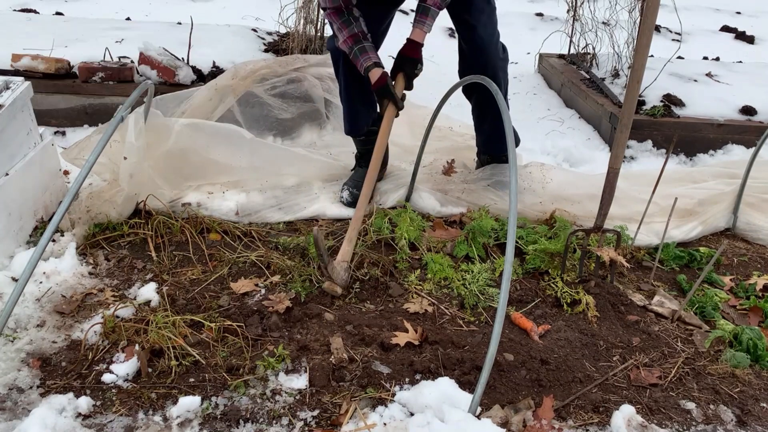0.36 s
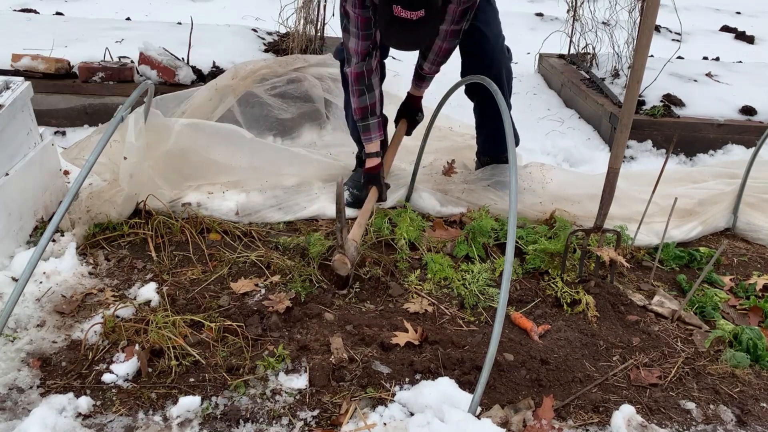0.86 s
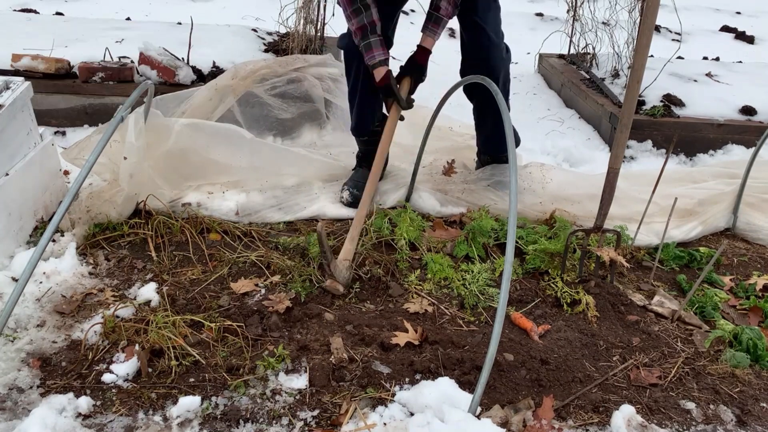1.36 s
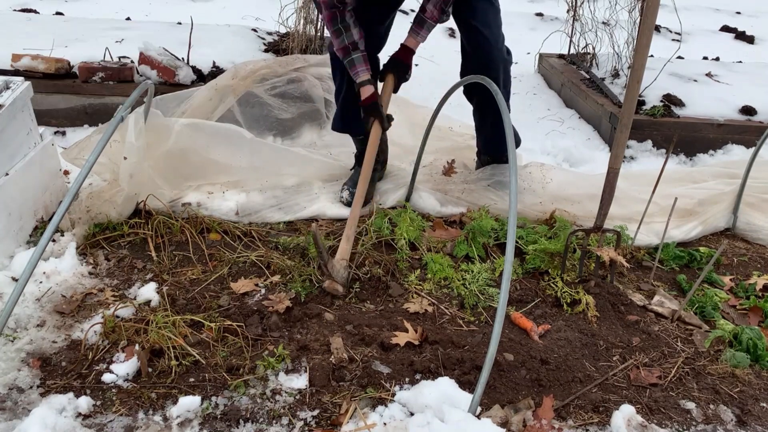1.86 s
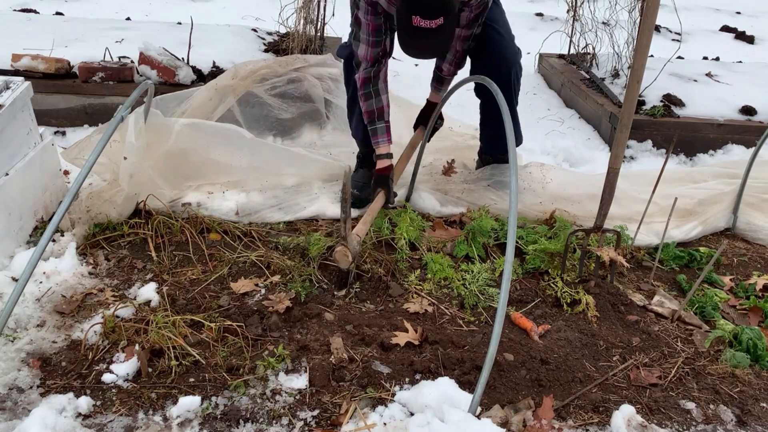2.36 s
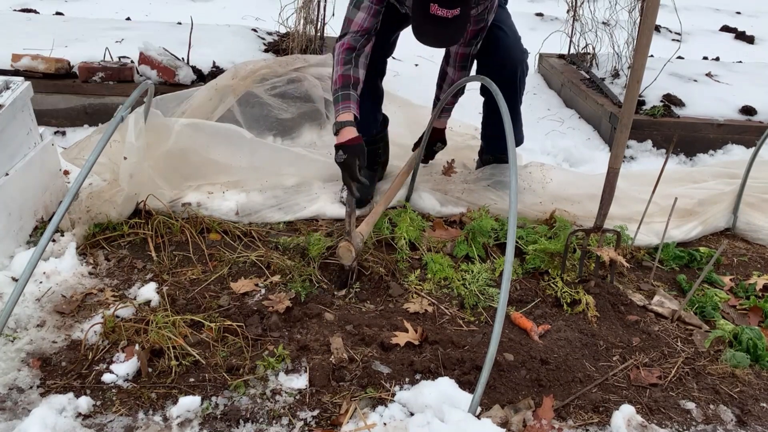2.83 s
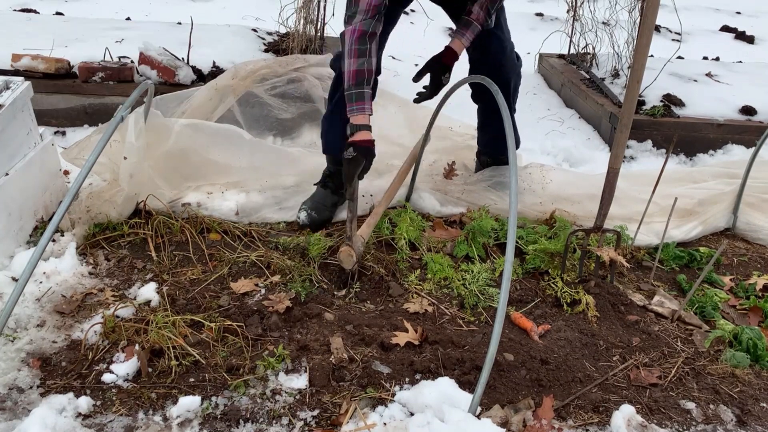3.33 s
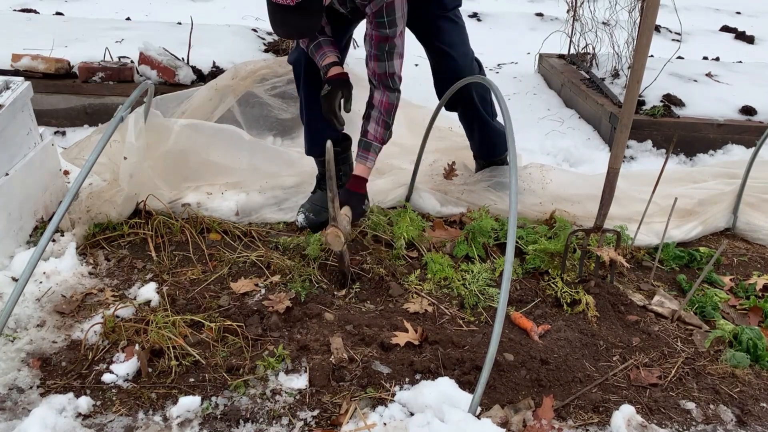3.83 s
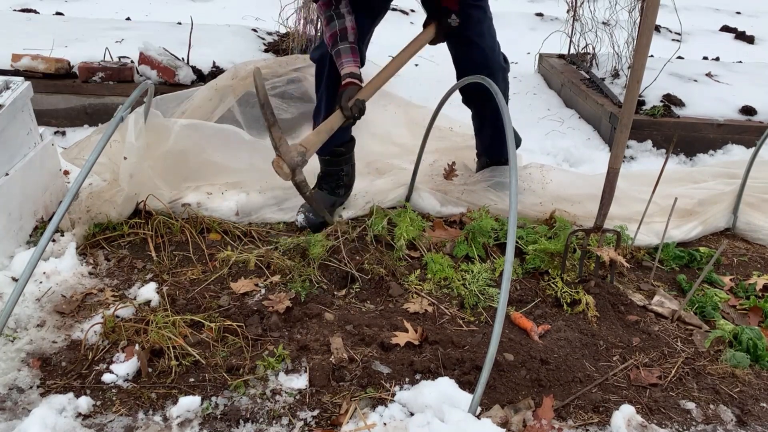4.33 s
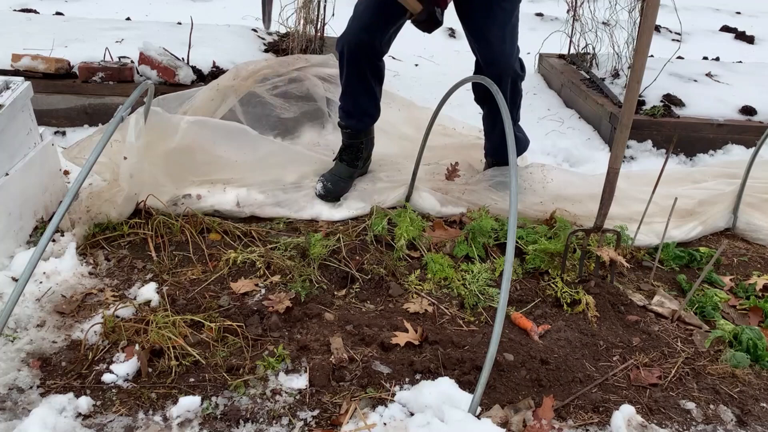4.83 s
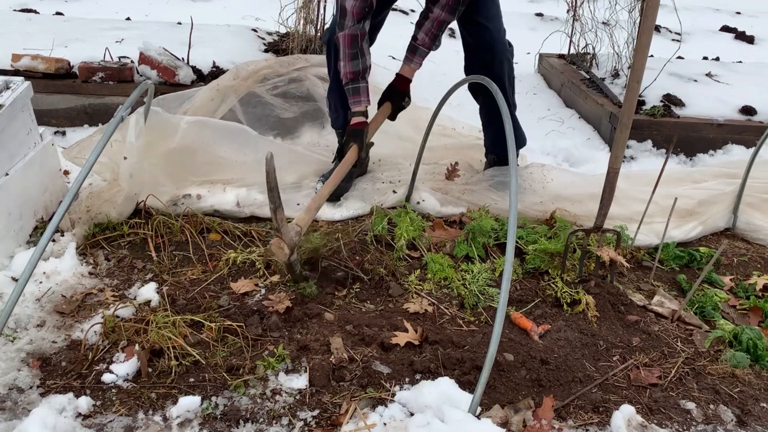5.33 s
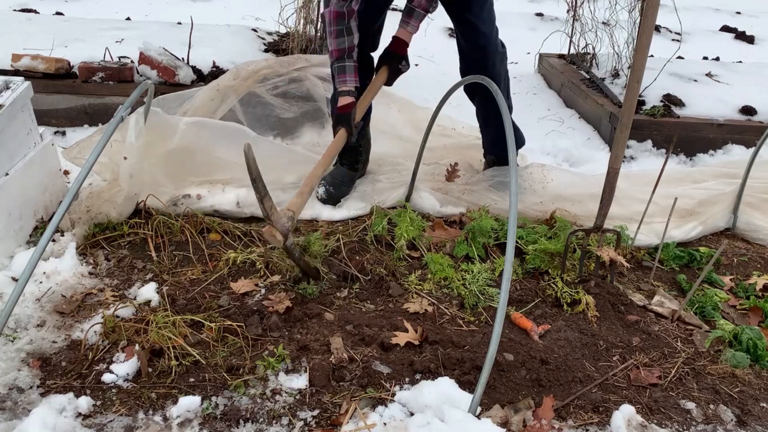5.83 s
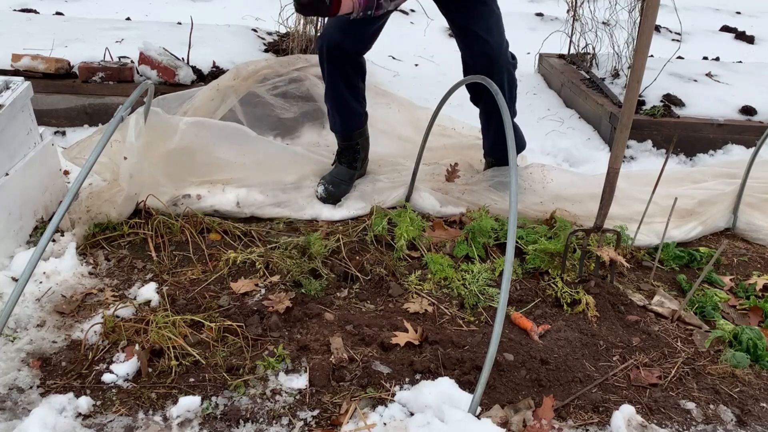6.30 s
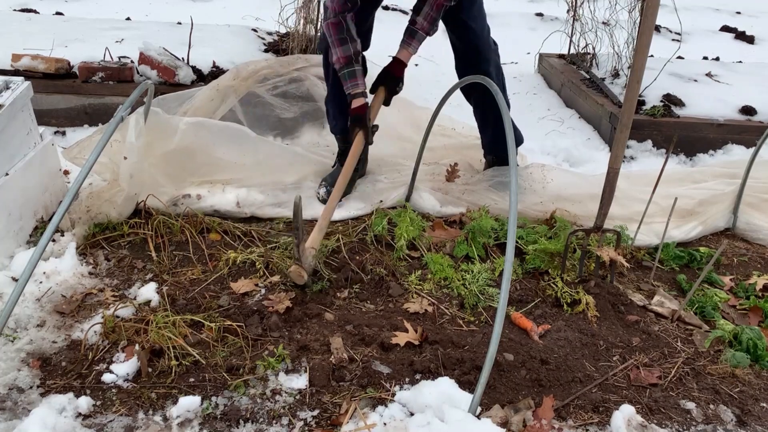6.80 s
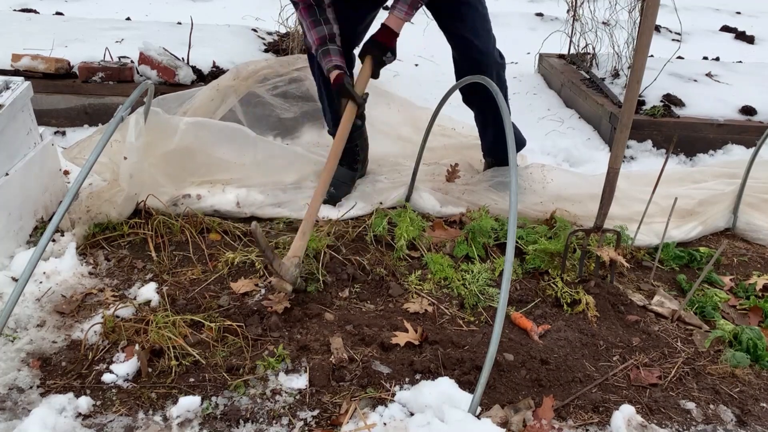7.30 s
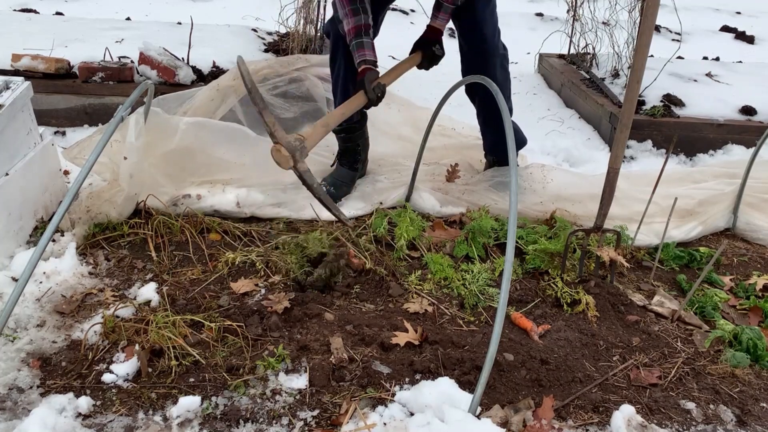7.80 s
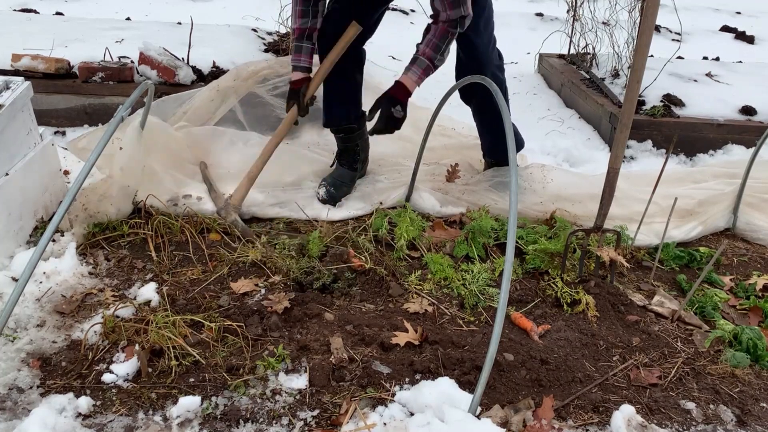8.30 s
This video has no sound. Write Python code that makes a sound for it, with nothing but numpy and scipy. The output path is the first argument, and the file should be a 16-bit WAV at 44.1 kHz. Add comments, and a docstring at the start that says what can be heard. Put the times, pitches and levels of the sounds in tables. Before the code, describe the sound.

Outdoors, close stereo microphone, faint air hiss and a distant car on the left. In the first half second, roots crackle and dry crumbs click as a pick is levered, with soft glove and sleeve rustle. Near 2.3 s a sharp, dry wooden knock; at 2.9 s a quick rattling chatter of the loose head. Around 3.2-3.4 s, rubbing bumps, a low thud and a faint squeak; another squeak at 3.9 s. The car's tyre moan and roar swell steadily. At 4.65 s a rough hand slide along the handle with a light knock. At 5.25 s a heavy blow: snap, crunch, deep thud, short steel ring. At 6.5 s another, brighter and icier, with scattering bits. The car passes at about 6.8 s from left to right, rumbling and hissing. Small clicks at 6.75 and 7.1 s, soft rustles, then a last glove scrape and handle knock at 8.3 s.

```python
"""A pickaxe is levered and swung into frozen soil in a snowy garden, close to a two-port microphone.
Each blow is a crunch of shaped noise with fading tones for the handle and the steel head; low tones are
the thuds of the frozen crust. Shaped noise makes gloves, sleeves, soft rustles and dry clicks; roots
crackle, the head chatters and the grip squeaks in short tones. Behind, over a faint air hiss, a car built
from six bands of noise comes up the road from the left and passes to the right."""
import sys
import numpy as np
from scipy import signal
from scipy.fft import rfft, irfft, next_fast_len
from scipy.io import wavfile
from scipy.ndimage import uniform_filter1d, map_coordinates

SR = 44100
rng = np.random.default_rng(int(sys.argv[2]) if len(sys.argv) > 2 else 0)


def ratio_of_db(decibels):
    """Turn decibels (scalar or array-like) into linear amplitude factors; 0 dB maps to 1."""
    return 10 ** (np.asarray(decibels, float) / 20)


def transcribe(signal):
    """Save signal, clipped to [-1, 1], as a 16-bit WAV file at the path in sys.argv[1]."""
    frames = np.atleast_2d(signal).T
    limited = np.clip(frames, -1, 1)
    pcm = np.round(limited * 32767).astype(np.int16)
    wavfile.write(sys.argv[1], SR, pcm)


N = 371189  # length in samples


def unit(x):
    """Scales a sound to an rms of 1."""
    return x / np.sqrt(np.mean(x ** 2) + 1e-20)


def curves(rows):
    """Joins table rows by straight lines: one value per sample for each column after the time."""
    times, *columns = np.transpose(rows)
    return [np.interp(np.arange(N) / SR, times, column) for column in columns]


def wobble(rate):
    """A smooth random curve through `rate` random points a second."""
    points = rng.standard_normal(int(N * rate / SR) + 4)
    return map_coordinates(points, [np.arange(N) * rate / SR])


def filtered(x, response):
    """Multiplies each frequency of a sound by response(hz)."""
    size = next_fast_len(x.shape[-1] + 8192)
    hz = np.fft.rfftfreq(size, 1 / SR)
    return irfft(rfft(x, size) * response(hz), size)[..., :x.shape[-1]]


def coloured(x, spectrum):
    """Filters a sound through (frequency [Hz], level [dB]) points, then scales it to an rms of 1."""
    points_hz, points_db = np.transpose(spectrum)

    def response(hz):
        return ratio_of_db(np.interp(np.log(hz + 1), np.log(points_hz), points_db))
    return unit(filtered(x, response))


def rush(spectrum, patchy_db):
    """Coloured noise, louder and softer in random patches of time and frequency."""
    noise = signal.stft(rng.standard_normal(N), nperseg=512)[2]
    patches = uniform_filter1d(rng.standard_normal(noise.shape), 5, 0)
    patches = unit(uniform_filter1d(patches, 12, 1))
    patchy = signal.istft(noise * ratio_of_db(patchy_db * patches), nperseg=512)[1][:N]
    return coloured(patchy, spectrum)


def ports(x, lag_ms, pan_db):
    """One sound at both ports: the left one is lag_ms later and pan_db louder than the right."""
    n = np.arange(len(x))
    half_lag = lag_ms * SR / 2000  # samples
    left = map_coordinates(x, [n - half_lag])
    right = map_coordinates(x, [n + half_lag])
    return np.array([left * ratio_of_db(pan_db / 2), right * ratio_of_db(-pan_db / 2)])


def air():
    """A faint, patchy hiss of the air, drawn separately from all the other sounds."""
    # tone of the hiss: (frequency [Hz], relative level [dB per Hz])
    air_tone = [(1500, -37), (3000, 2), (5000, -4), (8000, 0), (14000, -3), (16000, -8)]
    return ratio_of_db(-78) * rush(air_tone, patchy_db=2.5)


def car():
    """Noise voices reach the ports straight from the road, and scattered by fences and beds."""
    # (time [s], engine rumble [dB], low, middle and high tyre tones [dB each])
    car_levels = [(0.0, -57, -50, -50, -57), (0.7, -58, -48.5, -50.5, -59),
                  (1.2, -61.5, -48.5, -48.5, -56.5), (1.9, -53.5, -49.5, -43.5, -59.5),
                  (2.5, -56.5, -45.5, -41.5, -55.5), (3.1, -59, -42, -39.5, -49.5),
                  (3.6, -54, -40.5, -38.5, -48.5), (4.2, -52, -34.5, -38, -44), (4.5, -55, -33.5, -30, -41),
                  (4.8, -52.5, -32.5, -26, -38.5), (5.1, -43.5, -37, -28.5, -40),
                  (5.7, -43.5, -39, -31.5, -34.5), (6.2, -37, -44, -32, -38.5),
                  (6.62, -33.5, -47, -40.5, -40), (6.85, -35, -47.5, -41.5, -35),
                  (7.05, -33, -45.5, -38, -33.5), (7.22, -33, -45.5, -36, -33), (7.4, -38.5, -50, -39, -36),
                  (7.65, -36.5, -50, -40.5, -35), (8.1, -37, -53, -46.5, -39.5),
                  (8.4, -39.5, -47, -45, -39.5)]
    # roar and whirr once more off a wall along the road: (time [s], delay [ms], strength [0-1])
    wall_echo = [(0.0, 1.45, .15), (1.3, 1.43, .25), (2.0, 1.42, .2), (3.0, 1.33, .4), (3.9, 1.18, .55),
                 (4.5, 1.0, .6), (5.0, .8, 0)]
    # the hiss swells, briefly where the tyres cross grit: (time [s], rise over hiss [dB], half length [s])
    road_grit = [(6.998, 1, 0.15), (7.7, 3.5, 0.41), (7.85, 6.5, 0.014), (7.916, 10.5, .012)]
    # tones of the six voices: (frequency [Hz], relative level [dB per Hz])
    rumble_tone = [(20, -58.5), (40, -3.5), (85, 4), (130, -7), (200, -10.5), (350, -26), (900, -66)]
    drone_tone = [(120, -42.5), (200, -13.5), (278, -9), (298, -2.5), (320, -10.5), (400, -7), (480, -12),
                  (900, -59.5)]
    moan_tone = [(350, -24.5), (400, -20), (478, -17), (515, 6), (555, 3.5), (605, 5), (650, 3), (690, -3),
                 (1000, -56)]
    roar_tone = [(400, -22), (600, -21), (700, 1.5), (790, 6.5), (850, 6), (940, 3.5), (1020, -6),
                 (1100, -13.5), (1400, -22.5), (2200, -70)]
    whirr_tone = [(600, -36), (1000, 4.5), (1400, 2.5), (1600, 1.5), (2000, -5.5), (2800, -14), (4500, -58)]
    hiss_tone = [(1500, -31), (2500, 5), (4500, -0.5), (6500, -9.5), (8500, -20), (12000, -89),
                 (16500, -81)]
    # long waves bend round the microphone body: (lag factor [no unit] of rumble, drone, moan, roar)
    bend = 2.0, 1.6, 1.44, 1.2

    t = np.arange(N) / SR
    rumble_db, moan_db, roar_db, whirr_db = curves(car_levels)
    near_db = rumble_db + 60  # nearness: the rumble over that of the far car
    drone_db = -20.5 + 0.79 * moan_db + 0.19 * near_db
    hiss_db = 6 + 1.475 * whirr_db + 0.17 * near_db + 0.6 * wobble(40)
    for s, swell_db, half_s in road_grit:
        hiss_db = hiss_db + swell_db * np.exp(-((t - s) / half_s) ** 2)

    pass_s, abreast_s = 6.8, 0.75  # when the car is abreast; its distance then over its speed
    bearing = np.arctan((t - pass_s) / abreast_s)  # radians
    turned = bearing - 0.3  # the ports are turned from the road
    lag_ms = 0.465 * np.sin(turned)
    # a small constant lean to the left; the car's side gains more when it is near
    pan_db = 1.5 - 4.5 * np.tanh(turned / 0.12) * np.cos(bearing) ** 0.62
    echo_ms, echo_strength = curves(wall_echo)
    surge_db = 0.23 * wobble(5.0)

    def voice(spectrum, db, lag, pan, scatter_db, patchy_db, echo=0):
        straight = rush(spectrum, patchy_db)
        straight = straight + echo * map_coordinates(straight, [np.arange(N) - echo_ms * SR / 1000])
        scattered = np.array([rush(spectrum, patchy_db), rush(spectrum, patchy_db)])
        scatter = ratio_of_db(scatter_db - 0.2 * near_db)  # a near car sounds clearer
        return ratio_of_db(db + surge_db) * (ports(straight, lag, pan) + scatter * scattered)

    rumble_lag, drone_lag, moan_lag, roar_lag = np.outer(bend, lag_ms)
    rumble = voice(rumble_tone, rumble_db, rumble_lag, 0.065 * pan_db, scatter_db=-9.5, patchy_db=2.0)
    drone = voice(drone_tone, drone_db, drone_lag, 0.066 * pan_db, scatter_db=-3.5, patchy_db=0.5)
    moan = voice(moan_tone, moan_db, moan_lag, 1.1 * pan_db, scatter_db=-9.0, patchy_db=1.6)
    roar = voice(roar_tone, roar_db, roar_lag, 0.59 * pan_db, scatter_db=-11, patchy_db=2.3,
                 echo=echo_strength)
    whirr = voice(whirr_tone, whirr_db, lag_ms, 0.68 * pan_db, scatter_db=-4.0, patchy_db=3.0,
                  echo=echo_strength)
    hiss = voice(hiss_tone, hiss_db, lag_ms, -0.2 * pan_db, scatter_db=-2.5, patchy_db=1.3)
    return rumble + drone + moan + roar + whirr + hiss


def swell_level_db():
    """The level of the strongest rubbing or rustling swell at each moment."""
    # gloves and sleeves, and long soft rustles or hiss while the car passes; a row a swell:
    # (time at full force [s], relative level [dB], rise [s], hold [s], fall [s])
    swells = [(0.085, -60, 0.98, 0.1, 0.092), (0.647, -58.5, 0.064, 0, 0.47), (0.84, -65, 0.076, 0, 0.19),
              (1.205, -64.5, 0.027, 0.11, 0.11), (1.445, -73, .04, 0, .05),
              (1.89, -61.5, 0.15, 0.066, 0.13), (2.068, -64, 0.44, 0.029, 0.095),
              (2.448, -64, 0.092, 0, 0.074), (2.643, -58.5, 0.043, 0.024, 0.026),
              (2.761, -62, 0.11, 0.008, 0.019), (2.855, -58, 0.075, 0, 0.23),
              (3.179, -44, 0.007, 0.077, 0.02), (3.325, -42, 0.035, 0.034, 0.014),
              (3.376, -54.5, .03, 0.026, 0.027), (3.443, -67.5, .1, 0, 0.22),
              (3.906, -57.5, 0.75, 0, 0.083), (4.078, -65.5, 0.055, 0.021, 0.0093),
              (4.157, -55, 0.013, 0, 0.07), (4.302, -58, 0.029, 0, 0.12), (4.5, -55.5, 0.051, 0.22, .05),
              (4.624, -37.5, .05, .03, .05), (4.659, -33, 0.07, 0.016, 0.09),
              (4.82, -61.5, 0.19, 0.059, 0.012), (4.965, -57.5, 0.04, 0, .055),
              (5.35, -59, 0.29, 0.86, 0.17), (5.568, -47, 0.19, 0, 0.12), (5.88, -54, .05, 0, .2),
              (6.413, -55.5, 0.041, 0.052, 0.054), (6.345, -63, .1, 1, .1),
              (6.627, -58.5, 0.13, 0.16, 0.28), (6.743, -50, 0.0032, 0.042, 0.0067),
              (6.833, -58.5, 0.076, 0.11, 0.51), (7.136, -56.5, 0.11, 0.053, 0.18),
              (7.369, -58.5, 0.34, 0.063, 0.33), (7.658, -63, 0.3, 0.072, .27),
              (8.208, -41, 0.0069, 0.14, 0.021), (8.274, -33, 0.075, 0.016, 0.035),
              (8.308, -46, .05, 0.034, 0.058)]
    t = np.arange(0, N + 32, 32) / SR
    s, db, rise, hold, fall = np.transpose(swells)[..., None]
    rising = np.maximum(s - t, 0) / rise
    falling = np.maximum(t - s - hold, 0) / fall
    # a swell changes by 25 dB in its rise time and in its fall time
    strongest = np.max(db - 25 * (rising + falling), axis=0)
    return np.interp(np.arange(N) / SR, t, strongest)


def rubbing():
    """Fibres catch as dense grains; a hard slide gives its extra force to the handle."""
    # tone of the cloth: (frequency [Hz], relative level [dB per Hz])
    cloth_tone = [(1500, -58), (3000, 10), (4500, 9.5), (6500, 6.5), (8500, 19), (13500, 3), (16500, -20)]
    # tone of the handle under the glove: (frequency [Hz], relative level [dB per Hz])
    grip_tone = [(60, -0.5), (250, -3), (700, -3), (2000, -3), (3500, -11.5), (6000, -9)]
    db = swell_level_db() + 1.2 * wobble(25)
    hard_db = np.maximum(db + 50.0, 0)
    grain_db = 3.3 * wobble(700) + 1.5 * wobble(150) + 1.1 * wobble(60)
    grains = rng.standard_normal(N) * ratio_of_db(grain_db)
    cloth = ratio_of_db(db + 1.5 - 0.041 * hard_db) * coloured(grains, cloth_tone)
    # grains played backwards give the handle a texture unlike the cloth's
    grip = ratio_of_db(db + 5.0 + 0.29 * hard_db) * coloured(grains[::-1], grip_tone)
    wide = ratio_of_db(db - 22.0 - 0.15 * hard_db) * coloured(rng.standard_normal((2, N)), cloth_tone)
    return ports(cloth, 0.02, -3) + ports(grip, 0.039, 0.1) + wide


def squeak():
    """Faint short squeaks, each a single pitch, as the grip shifts."""
    # (time [s], half length [s], pitch [Hz], level [dB])
    squeaks = [(3.42, .03, 1200, -46), (3.895, .028, 1925, -46)]
    t = np.arange(N) / SR
    out = np.zeros(N)
    for s, half_s, hz, db in squeaks:
        swell = np.exp(-((t - s) / half_s) ** 4)
        out += ratio_of_db(db) * swell * np.sin(2 * np.pi * hz * t)
    return out


def dry_clicks():
    """Dry clicks of noise, some with a duller body: crumbs of earth, and the sharp snap within a blow."""
    # (time [s], relative level [dB], relative level of the body [dB])
    ticks = [(0.045, -56, 5), (0.0553, -48, 0), (0.0595, -55, 8), (0.07, -56, 5), (0.104, -50, 0),
             (0.109, -57, 6), (0.381, -66, 8), (0.486, -68, 9), (0.585, -68, 9), (1.273, -64, 9),
             (1.435, -67, 9), (0.175, -56, -6), (0.2136, -54, 7), (0.297, -59, 8), (0.3, -60, 8),
             (0.322, -58.5, 7), (0.444, -66.5, 13.5), (0.5322, -63, 3), (0.558, -68, 14),
             (0.5735, -55.5, 3), (1.134, -58, -5), (1.1772, -68, 1), (1.70, -67, -5), (1.3443, -62, 13),
             (0.284, -66, 2), (0.392, -69, -4), (2.1544, -65, 6), (2.701, -48, 1.5), (3.1637, -59, -8),
             (3.328, -45, 5), (3.3802, -51, -6), (4.0584, -54, 7), (4.6944, -35, -12), (5.2543, -14, -11),
             (5.3625, -49, -6), (6.7463, -33, -6), (6.753, -33, -5), (7.138, -37, -14)]
    snap_tone = [(5500, -30), (10500, -5), (11800, -1), (15000, 0), (17000, -6)]
    body_tone = [(600, -9), (1800, 1.5), (4000, -7), (6000, -8.5), (10000, -30)]
    out = np.zeros(N + SR)
    t = np.arange(SR // 20) / SR
    fade = ratio_of_db(-60 * t / 0.007) + ratio_of_db(-12 - 60 * t / 0.03)
    for s, db, body_db in ticks:
        snap = coloured(rng.standard_normal(len(t)), snap_tone)
        body = ratio_of_db(body_db - 2.5) * coloured(rng.standard_normal(len(t)), body_tone)
        out[round(s * SR):][:len(t)] += ratio_of_db(db + 4.5) * fade * (snap + body)
    return ports(out[:N], 0.006, -1.0)


def crackle(count=160):
    """Roots and stems tear as the point is levered at the start, ever more rarely and softly."""
    when, pitch, size = rng.random((count, 3)).T
    s = -0.14 * np.log(1 - 0.95 * when)  # crowded at first, then sparse
    hz = (2600 * 3.5 ** pitch)[:, None]
    t = np.arange(128) / SR
    loudness = ratio_of_db(-51 - 15 * s + 6.4 * size)[:, None]
    grains = loudness * np.exp(-0.6 * hz * t) * np.sin(2 * np.pi * hz * t)
    where = (s * SR).astype(int)[:, None] + np.arange(128)
    mixed = np.bincount(where.ravel(), grains.ravel(), N)
    return ports(mixed, 0.061, -1.5)


def chatter(count=7):
    """The loose head chatters: a quick train of fading bounces, each a dead knock of the handle end."""
    # (time [s], bounces per second [1/s], level [dB], time for the train to fade by 60 dB [s])
    trains = [(2.8668, 322, -23, .06)]
    # tones of the handle end in the socket: (pitch [Hz], relative level [dB], time to fade by 60 dB [s])
    socket = [(330, -11, .015), (648, -1, .022), (975, -2, .018), (1310, -2.5, .016), (2400, -12, .01),
              (3100, -10, .006)]
    out = np.zeros(N + SR)
    t = np.arange(SR // 20) / SR
    knock = sum(ratio_of_db(db - 60 * t / t60) * np.sin(2 * np.pi * hz * t) for hz, db, t60 in socket)
    for s, rate, db, t60 in trains:
        for k in range(count):
            start = round((s + (k + rng.normal(0, 0.03)) / rate) * SR)
            first_db = -5 if k == 0 else 0  # the first bounce is held down
            bounce_db = db - 60 * k / rate / t60 + first_db + rng.normal(0, 1)
            out[start:][:len(t)] += ratio_of_db(bounce_db) * knock
    return ports(out[:N], 0.0095, -1.1)


def thuds():
    """The frozen crust gives way and swings in its low tones, those near the centre most."""
    # (time [s], level [dB], centre [Hz], spread [octaves])
    thud_rows = [(2.316, -27, 280, 0.68), (3.179, -30, 130, 1.6), (3.332, -24.5, 170, 0.78),
                 (3.347, -22, 100, 0.65), (5.257, -19, 220, 0.8), (5.263, -11.5, 96, 0.3),
                 (6.492, -10, 298, 1.2), (6.512, -20, 85, 0.5), (8.275, -22, 180, .8)]
    # tones of the crust: (pitch [Hz], time to fade by 60 dB [s])
    crust = [(48, 0.0173), (95, 0.088), (126, 0.071), (172, 0.061), (240, 0.048), (339, 0.061),
             (450, 0.054)]
    out = np.zeros(N + SR)
    t = np.arange(SR // 2) / SR
    onset = 1 - np.exp(-t / 0.0045)
    for s, db, centre_hz, spread in thud_rows:
        swing = np.zeros(len(t))
        for hz, t60 in crust:
            off_centre_db = 3.1 * (np.log2(hz / centre_hz) / spread) ** 2
            swing += ratio_of_db(db - off_centre_db - 60 * t / t60) * np.sin(2 * np.pi * hz * t)
        out[round(s * SR):][:len(t)] += swing * onset
    return out[:N]


def blows():
    """A short crunch shakes the handle near one pitch and rings the head, briefly when soil grips it."""
    # steel on stone and frozen clods: (time [s], rise [s], crunch level [dB], crunch length [s],
    # treble over crunch [dB], knock level [dB], knock centre [Hz], steel level [dB],
    # steel tilt [dB per octave], fade of 60 dB by the soil's damping alone [s])
    blow_rows = [(2.3138, 0.002, -33, 0.0054, -8, -14, 1300, -57, 4.5, 0.67),
                 (2.338, 0.0028, -57, 0.019, -15, -31, 1200, -72, 2, 0.6),
                 (2.8653, 0.0025, -33.5, 0.0094, 1, -26, 950, -49, 5.5, 0.4),
                 (4.657, .002, -42, .012, -8, -34, 2300, -50, 0, .05),
                 (8.2695, .002, -33, .006, -8, -23, 1500, -48, 0, .04),
                 (8.278, .002, -32, .008, -8, -25, 720, -45, 0, .04),
                 (3.3268, 0.00065, -39.5, 0.014, -14.5, -32.5, 890, -60, 6, .3),
                 (6.4854, 0.00071, -27.5, 0.0071, 6.5, -41, 900, -22.5, 0, 0.059),
                 (5.2489, 0.0058, -29, 0.011, -2, -25, 1150, -19.5, -2.5, 0.055)]
    # tones of the handle: (pitch [Hz], relative level [dB], time to fade by 60 dB [s])
    handle = [(348, 7, 0.078), (414, 6.5, .05), (653, -1, 0.051), (815, -17, 0.028), (958, -6, 0.034),
              (1015, -7.5, 0.032), (1140, 2, 0.023), (1327, -9.5, 0.024), (1710, -8, 0.051),
              (1970, -9, 0.042), (2410, -1, 0.022)]
    # tones of the pick head: (pitch [Hz], relative level [dB], time to fade by 60 dB without soil [s])
    steel = [(1500, 1, .07), (1830, -5, .05), (2187, -1, .04), (3760, -1, .045), (4040, -2, .035),
             (4610, -7, .04), (4950, -4, .04), (6690, -1, .04), (6970, -2, .035), (9530, -8, .03),
             (9770, -6, .2), (9985, -3, .22), (10065, -8, .15), (11280, -6, .04)]
    # tone of the crunch: (frequency [Hz], relative level [dB per Hz])
    crunch_tone = [(300, 4), (1200, 9), (3000, 4), (4500, 1.5), (6800, -2), (9000, -40)]
    # tone of the chips of ice: (frequency [Hz], relative level [dB per Hz])
    spit_tone = [(4000, -22.5), (7000, -3), (10000, -4.5), (11800, -1), (16500, -13.5)]
    out = np.zeros((2, N + SR))
    t = np.arange(SR // 2) / SR

    def tone(db, hz):
        """A tone of the given level curve, from a random point of its wave."""
        return ratio_of_db(db + rng.normal(0, 1)) * np.sin(2 * np.pi * (hz * t + rng.random()))

    for (s, rise, crunch_db, length, treble_db, knock_db, centre_hz,
         steel_db, tilt_db, soil_t60) in blow_rows:
        after = np.maximum(t - length, 0)
        spatter = ratio_of_db(-21.5 - 60 * t / 0.18)  # loosened earth falls back
        grit = rng.standard_normal(len(t)) * ratio_of_db(2.8 * wobble(1500)[:len(t)])
        crunch = (ratio_of_db(-60 * after / 0.039) + spatter) * coloured(grit, crunch_tone)
        spit = (ratio_of_db(-60 * after / 0.025) + 0.6 * spatter) * coloured(grit, spit_tone)
        spit = ratio_of_db(treble_db) * spit

        # tones hold while the point still bites, then fade
        handle_free = np.maximum(t - 0.14 * length, 0)
        steel_free = np.maximum(t - 0.55 * length, 0)
        knock = np.zeros(len(t))
        for hz, db, t60 in handle:
            off_centre_db = 13.8 * np.log2(hz / centre_hz) ** 2
            knock += tone(knock_db + db - off_centre_db - 60 * handle_free / t60, hz)
        ring = np.zeros(len(t))
        for hz, db, t60 in steel:
            start_db = steel_db + db + tilt_db * np.log2(hz / 1500)
            ring += tone(start_db - 60 * steel_free * (1 / t60 + 1 / soil_t60), hz)
        ring = ring * ratio_of_db(1.8 * wobble(900)[:len(t)] - 0.4)  # grit rasps on the steel

        blow = ratio_of_db(crunch_db) * (crunch + spit) + knock + ring
        onset = 1 - np.exp(-t / rise)
        out[:, round(s * SR):][:, :len(t)] += ports(blow * onset, 0.0094, -1.2)
    return out[:, :N]


def scene():
    """Road, gardener and soil over a faint air hiss."""
    background = air() + car()
    gardener = rubbing() + squeak()
    soil = dry_clicks() + crackle() + thuds()
    return background + gardener + soil + chatter() + blows()


def roll_off(x):
    """The treble ends steeply here."""
    return signal.sosfilt(signal.butter(12, 16870, fs=SR, output="sos"), x)


def record(dry):
    """The high treble is nearly one signal for both sides, of opposite sign in some bands."""
    # bands where the right side has the opposite sign: (lower edge [Hz], upper edge [Hz])
    flipped_bands = [(7800, 9280), (12350, 14330), (15900, 17500)]

    def above(hz, edge_hz):
        """Glides from 0 below the edge to 1 above it."""
        return 0.5 + 0.5 * np.tanh((hz - edge_hz) / 120)

    def own_share(hz):
        return 1 - 0.97 * above(hz, 7350)

    def sign(hz):
        return 1 - 2 * sum(above(hz, low) - above(hz, high) for low, high in flipped_bands)

    def top_cut(hz):
        return ratio_of_db(-42 * above(hz, 15850))

    own = filtered(dry[1], own_share)
    borrowed = filtered(dry[0], lambda hz: (1 - own_share(hz)) * sign(hz))
    mix = filtered(np.array([dry[0], own + borrowed]), top_cut)
    return roll_off(mix)


dry = scene()
out = record(dry)
transcribe(out)
```